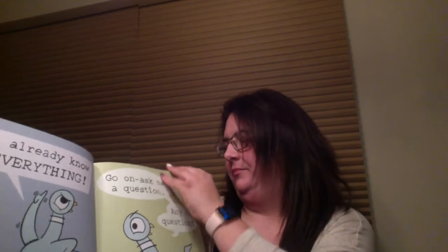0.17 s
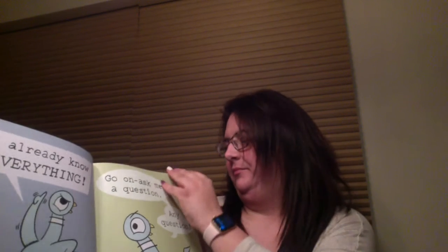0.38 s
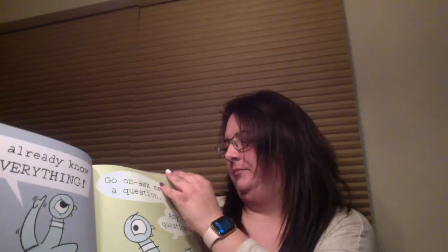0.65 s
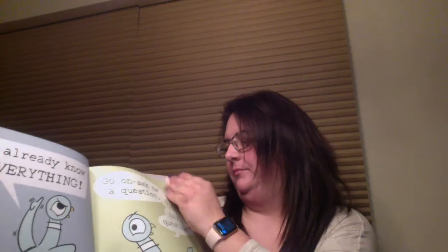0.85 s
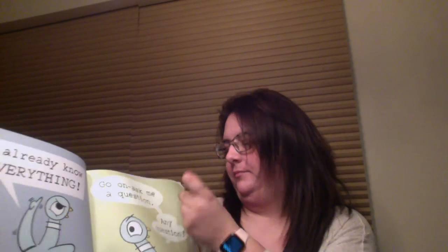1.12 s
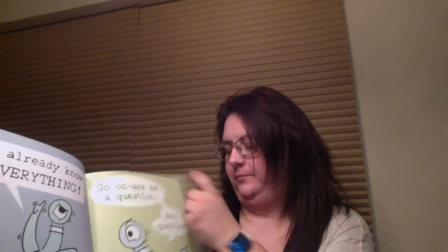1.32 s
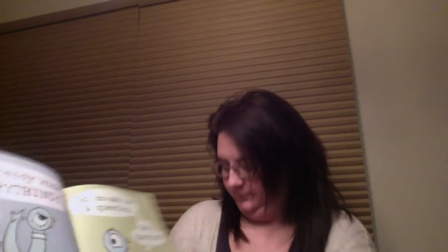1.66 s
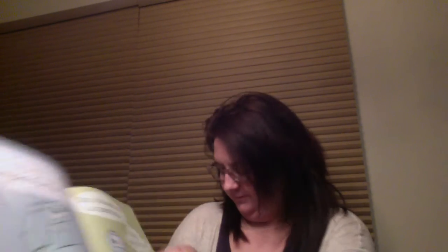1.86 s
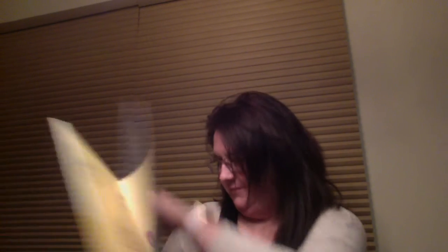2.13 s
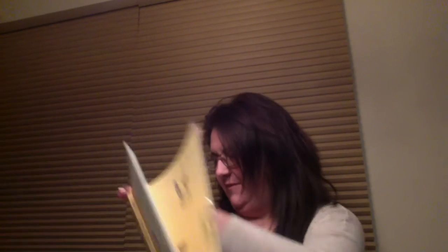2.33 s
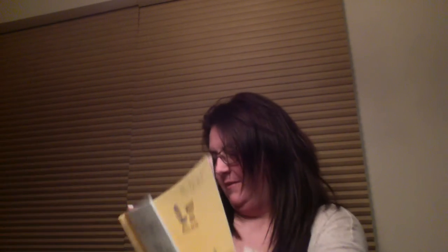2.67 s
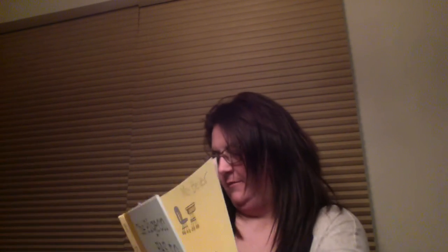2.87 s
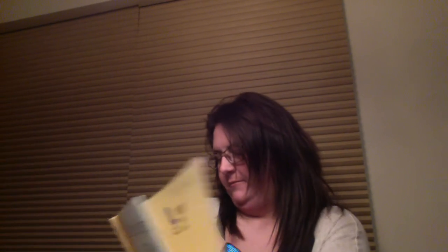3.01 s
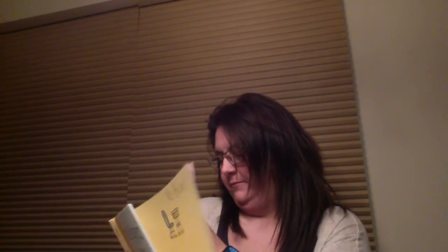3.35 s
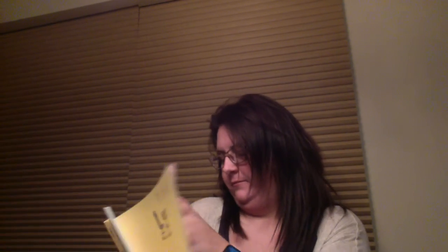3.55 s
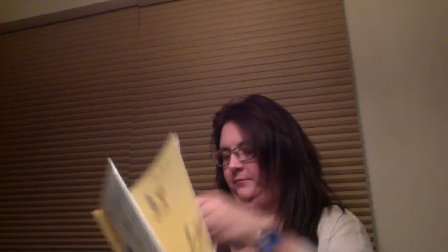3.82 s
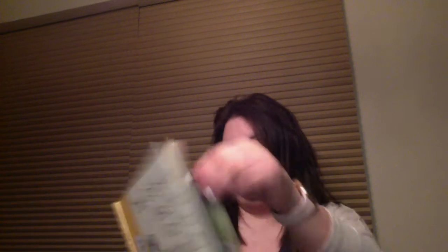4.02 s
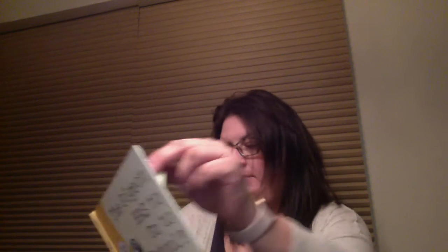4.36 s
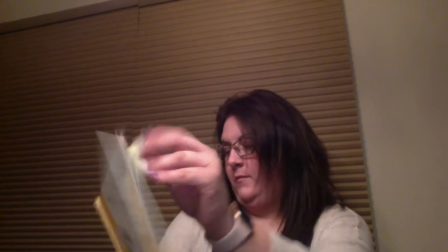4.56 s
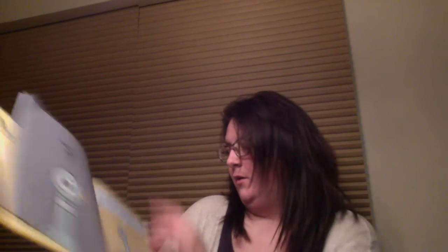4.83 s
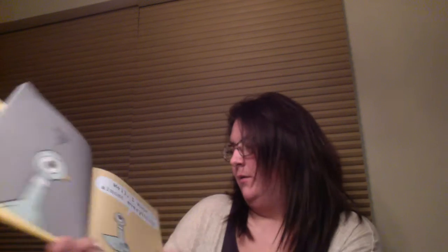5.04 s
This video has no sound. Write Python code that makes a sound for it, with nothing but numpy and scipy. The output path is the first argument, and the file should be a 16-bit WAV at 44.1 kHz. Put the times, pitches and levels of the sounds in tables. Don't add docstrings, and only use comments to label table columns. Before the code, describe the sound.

A low, soft fan hum and room tone run throughout a small furnished room, heard through a thin small microphone close to a stiff-paged book. For the first 0.7 s there is only barely audible sheet dragging. At 0.8 s a page buckles with a dry pop, followed by bright finger hiss; a second, multi-part buckle comes at 1.35 s. Grainy rubbing and strokes swell around 1.6 and 2.0 s. A corner flicks free at 2.4 s, small creases crackle at 2.7 s, and a page slaps sharply at 3.0 s. Sheets buckle at 3.4 s, rubbing rises from 3.65 s, a flat slap lands at 3.82 s and the hardest snap hits at 3.9 s, with a brief room tail. Crisp flicks flutter at 4.15-4.26 s, lighter ones at 4.6 and 4.73 s, then near quiet, with a tiny last buckle at 5.15 s.

```python
import sys
import numpy as np
from scipy import signal
from scipy.fft import rfft, irfft
from scipy.io import wavfile

SR = 44100
rng = np.random.default_rng(int(sys.argv[2]) if len(sys.argv) > 2 else 0)


def ratio(d):
    e = np.asarray(d, float) / 20
    return 10 ** e


def digitize_waveform(pressure):
    field = np.atleast_2d(pressure).T
    bounded = np.clip(field, -1, 1)
    quanta = np.round(bounded * 32767).astype(np.int16)
    wavfile.write(sys.argv[1], SR, quanta)


N = 228702


def rms_one(x):
    return x / np.sqrt(np.mean(x ** 2) + 1e-30)


def at_hz(points, hz):
    table_hz, value = np.transpose(points)
    return np.interp(np.log(hz + 1), np.log(table_hz), value)


def in_time(rows):
    s, value = np.transpose(rows)
    return np.interp(np.arange(N) / SR, s, value)


def coloured(x, spectrum, outside_db=-60):
    below = (spectrum[0][0] / 1.5, outside_db)
    above = (spectrum[-1][0] * 1.3, outside_db)
    hz = np.arange(len(x) // 2 + 1) * SR / len(x)
    return irfft(rfft(x) * ratio(at_hz([below, *spectrum, above], hz)), len(x))


def butter(x, order, hz, kind):
    return signal.sosfilt(signal.butter(order, hz, kind, fs=SR, output="sos"), x)


def resonance(x, hz, width_hz):
    r = np.exp(-np.pi * width_hz / SR)
    gain = (1 - r * r) / 2
    return signal.lfilter([gain, 0, -gain], [1, -2 * r * np.cos(2 * np.pi * hz / SR), r * r], x)


def drift(rate):
    r = np.exp(-2 * np.pi * rate / SR)
    wander = signal.lfilter([1], [1, -2 * r, r * r], rng.standard_normal(N + SR))
    return rms_one(wander[SR:])


def friction(per_s, spread_db, clump_db):
    sizes = ratio(spread_db * np.minimum(rng.exponential(1, N), 5)) * rng.choice([-1, 1], N)
    slips = rng.random(N) < per_s / SR
    return sizes * slips * ratio(clump_db * drift(74))


def patchy(x, edges, patchy_db, rate):
    bands = [butter(x, 2, pair, "band") for pair in zip(edges, edges[1:])]
    return [band * ratio(patchy_db * drift(rate)) * (-1) ** k for k, band in enumerate(bands)]


def gestures(rows, rest_db, rest_share_db):
    t = np.arange(N) / SR
    roundness = 0.83
    main, second = ratio(2 * rest_db), ratio(2 * (rest_db + rest_share_db))
    for s, db, rise_s, fall_s, share_db in rows:
        away = np.abs(t - s) / np.where(t < s, max(rise_s, .002), max(fall_s, .002))
        power = ratio(2 * (db - 20 * np.minimum(away, 10) ** roundness))
        main = main + power
        second = second + power * ratio(2 * share_db)
    return 10 * np.log10(main), 10 * np.log10(second / main)


# frequency in Hz, level in dB per Hz.
ROOM_TONE = [(30, -54), (62, -28), (82, -51), (100, -20), (125, -11.5), (240, -11), (300, -6), (440, -11.5),
             (900, -14.5), (2100, -18), (2700, -25), (4200, -29), (8000, -45.5), (16000, -55)]
# frequency in Hz, width in Hz, level in dB.
FAN_WHISTLES = [(288.9, 9.9, -72.5), (580, 14.7, -76.5), (1400, 14, -76), (3030, 2.2, -98),
                (10100, 27, -100)]
# time in seconds, gain in dB.
ROOM_SWELL = [(0, 1), (.8, 1), (1.3, 5), (2, 4), (2.8, 3.5), (3.6, 6), (4.3, 6.5), (4.8, 1.5), (5.19, 2.5)]


def background():
    room_noise, fan_noise = rng.standard_normal((2, N))
    tone = ratio(-61.5 - 3.0) * rms_one(coloured(room_noise, ROOM_TONE)) * ratio(2.43 * drift(10.3))
    fan = np.zeros(N)
    for hz, width_hz, db in FAN_WHISTLES:
        whistle = resonance(resonance(fan_noise, hz, width_hz), hz, width_hz)
        fan += ratio(db) * rms_one(whistle)
    return ratio(in_time(ROOM_SWELL)) * (tone + fan)


# delay in milliseconds, level in dB.
NEAR_ECHOES = [(6.5, -14), (11, -13), (18, -37), (25, -31)]
# frequency in Hz, time to fall 60 dB in seconds.
ROOM_DECAY = [(150, 0.36), (600, 0.3), (2000, 0.3), (6000, 0.29), (14000, 0.12)]


def room(x):
    size = SR // 2
    t, tail = np.arange(size) / SR, np.zeros(size)
    white = rng.standard_normal((2, size))
    edges = 90 * 2 ** np.arange(0, 7.6, .75)
    for k, (low, high) in enumerate(zip(edges, edges[1:])):
        band = butter(white[k % 2], 2, [low, high], "band")
        tail += band * ratio(-60 * t / at_hz(ROOM_DECAY, np.sqrt(low * high)))
    tail *= np.clip((t - .002) / 0.0023, 0, 1)
    tail *= ratio(-8.5) / np.sqrt(np.sum(tail ** 2))
    for ms, echo_db in NEAR_ECHOES:
        tail[round(ms * SR / 1000)] += ratio(echo_db)
    return signal.fftconvolve(x, tail)[:N]


# frequency in Hz, level in dB per Hz.
SKIN_COLOUR = [(2940, -29), (5000, -6.5), (5540, -8), (7560, -2.5), (8210, -10.5), (9370, -3),
               (11100, -6.5), (13100, -10.5), (16000, -22)]
# peak in seconds, hiss in dB, rise in seconds, fall in seconds, brightness in dB.
FINGER_STROKES = [(.925, -53, 0.038, 0.1, -6.5), (1.03, -60.5, 0.087, 0.1, 0.5),
                  (1.16, -85, .06, 0.089, 16), (2.08, -65, 0.17, 0.18, 2.5), (1.225, -58, 0.11, 0.15, -3),
                  (1.6, -69, 0.087, 0.087, -6), (1.809, -79, 0.13, 0.087, -5), (2.0, -52, 0.052, 0.19, -3),
                  (2.18, -70, 0.073, 0.13, 3), (2.59, -61, 0.044, .18, -15), (2.722, -51, 0.031, 0.045, -6),
                  (2.94, -55, 0.14, 0.072, -4), (3.27, -60, 0.034, 0.15, -6.5),
                  (3.666, -42.5, 0.037, 0.039, -11), (3.73, -49, 0.11, 0.18, 0),
                  (3.812, -40, 0.026, 0.034, 4), (4.078, -55, 0.021, 0.017, 2),
                  (4.565, -59, 0.043, 0.11, 5.5)]
# peak in seconds, hiss in dB, fall in seconds, brightness in dB.
EDGE_BRUSHES = [
    (.81, -65, .12, -8),
    (2.415, -56.5, 0.066, -8),
    (3.025, -50, 0.087, -34),
    (3.399, -54.5, 0.046, -5),
    (3.554, -57, 0.17, -2.5),
    (3.914, -45, 0.16, -2.5),
    (4.16, -51, 0.049, 5.5),
    (4.209, -64.5, 0.21, -6),
    (4.622, -46.5, 0.06, -7),
    (4.74, -83, .04, -5),
]
# peak in seconds, hiss in dB, half width in seconds.
FAINT_TOUCHES = [
    (.255, -83, 0.067),
    (0.431, -81, 0.011),
    (.575, -78, 0.049),
    (1.461, -81, 0.013),
    (1.54, -68.5, 0.029),
    (4.332, -67.5, .03),
    (4.9, -77, .02),
    (5.1, -84, 0.12),
]


def strokes():
    brushes = [(s, db, 0.019, fall_s, bright_db) for s, db, fall_s, bright_db in EDGE_BRUSHES]
    touches = [(s, db, half_s, half_s, -9.5) for s, db, half_s in FAINT_TOUCHES]
    hiss_db, bright_db = gestures(FINGER_STROKES + brushes + touches, rest_db=-93.5, rest_share_db=-3)
    skin = coloured(friction(14000, spread_db=-1.5, clump_db=0.6), SKIN_COLOUR)
    bands = patchy(skin, np.geomspace(5200, 16200, 13), patchy_db=4.5, rate=9.2)
    body = rms_one(sum(bands[:6]))
    top = ratio(-1.0 + 0.65 * bright_db) * sum(bands[10:])
    treble = rms_one(sum(bands[6:10]) + top)
    return ratio(hiss_db) * (body + ratio(bright_db) * treble)


# frequency in Hz, level in dB per Hz.
COVER_COLOUR = [(500, -1.5), (800, 9), (1500, 4), (2200, 7)]
# peak in seconds, rub in dB, rise and fall in seconds (over 20 dB), cover share in dB.
SHEET_DRAGS = [(.258, -68, 0.3, 0.086, 3.5), (.39, -70.5, 0.21, 0.14, 5.5), (.93, -59, 0.16, 0.9, 2.5),
               (1.244, -56, 0.24, 0.088, 1.5), (1.468, -69, 0.076, 0.028, 19),
               (1.604, -58, 0.068, 0.064, 2), (1.98, -60.5, 0.21, 0.32, 0.5), (2.195, -55, 0.046, .11, -1),
               (2.63, -60, 0.11, 0.13, 6), (2.73, -50.5, .04, 0.062, -7), (2.946, -60, 0.62, 0.15, 4),
               (3.05, -47, .05, 0.14, -1), (3.276, -59, 0.055, 0.099, 3), (3.566, -65.5, 0.11, 0.41, 3.5),
               (3.672, -45, 0.027, 0.055, -8.5), (3.725, -43.5, 0.083, 0.24, -9),
               (3.81, -53, 0.12, 0.094, -2)]
# peak in seconds, rub in dB, fall in seconds, cover share in dB.
SHEET_SETTLES = [
    (.81, -68, 0.24, -10),
    (1.41, -81, 0.096, 21),
    (2.43, -55, 0.058, -10),
    (3.43, -58.5, 0.083, 5.5),
    (3.861, -46.5, 0.092, 3),
    (3.945, -45, 0.26, 1),
    (4.2, -55.5, 0.24, 1),
    (4.62, -53.5, 0.093, -4),
    (4.76, -67, 0.21, 10),
]
# time in seconds, frequency in Hz.
SHEET_TAUTNESS = [(0, 2880), (.78, 2830), (.92, 3600), (1.14, 3000), (1.45, 2670), (1.89, 2650),
                  (1.97, 4040), (2.3, 3140), (2.45, 4010), (2.62, 2930), (2.72, 3570), (3.1, 3045),
                  (3.56, 2724), (3.63, 3590), (3.88, 2676), (4.0, 3250), (4.6, 3775), (5.0, 2740)]


def slides():
    settles = [(s, db, 0.063, fall_s, share_db) for s, db, fall_s, share_db in SHEET_SETTLES]
    sheet_db, cover_share_db = gestures(SHEET_DRAGS + settles, rest_db=-89.5, rest_share_db=11.5)
    cover = coloured(friction(6000, spread_db=0.0, clump_db=2.0), COVER_COLOUR)
    cover = rms_one(sum(patchy(cover, np.geomspace(420, 2500, 9), patchy_db=5.0, rate=3.3)))
    slips = friction(9000, spread_db=3.0, clump_db=1.5)
    broad = coloured(slips, [(2200, 1.0), (3500, 2.5), (5500, -2.5)])
    broad = rms_one(sum(patchy(broad, np.geomspace(1900, 6000, 9), patchy_db=0.0, rate=26.0)))
    low_noise = rms_one(butter(slips, 2, 250, "low"))
    carrier = np.sin(2 * np.pi * np.cumsum(in_time(SHEET_TAUTNESS)) / SR)
    gliding = low_noise * np.sqrt(2) * carrier
    sheet = 0.82 * broad + 0.5 * gliding
    return ratio(sheet_db) * (ratio(cover_share_db) * cover + sheet)


# start in seconds, peak in dB, centre in Hz.
EDGE_TICKS = [(0.4299, -55, 7200), (0.5664, -59, 4140), (0.7945, -28, 4030), (0.9655, -33, 7640),
              (1.348, -32, 5600), (1.3872, -80, 4000), (1.4484, -66, 8000), (2.1984, -45, 4030),
              (2.399, -25.5, 4600), (2.5237, -53, 4130), (2.9981, -16, 4060), (3.543, -39.5, 7340),
              (3.9018, -16.5, 4170), (4.0104, -31.5, 4390), (4.1488, -22, 5960), (4.153, -34, 5170),
              (4.1949, -27.5, 5300), (4.2614, -44, 4610), (4.2714, -47, 4000), (4.5184, -48.5, 9820),
              (4.6169, -25, 7050), (4.7378, -38, 4200), (1.459, -46, 9000)]


def ticks():
    out, size = np.zeros(N + SR), 256
    t = np.arange(size) / SR
    for s, peak_db, hz in EDGE_TICKS:
        jolt = rng.standard_normal(size) * np.exp(-t / 0.0029)
        tick = butter(resonance(jolt, hz, 0.51 * hz) + 0.025 * jolt, 3000 and 2, 3000, "high")
        at = round(s * SR)
        out[at:at + size] += ratio(peak_db - 3.5) * tick / np.abs(tick).max()
    return out[:N]


# frequency in Hz, level in dB per Hz.
CRACK_COLOUR = [(3500, 30), (5000, 20.5), (6300, 10.5), (8000, -7.5), (11000, -2.5), (15500, -53)]


def snaps(events, width, overtone, rise_ms):
    out, size = np.zeros(N + SR), 2048
    t = np.arange(size) / SR
    push = np.exp(-((t - .0012) / 0.00014) ** 2)
    thump = resonance(push, 250, 155) + 0.31 * resonance(push, 467, 195)
    thump = thump / np.abs(thump).max()
    for s, peak_db, hz, crack_db, thump_db, ms in events:
        jolt_noise, crack_noise = rng.standard_normal((2, size))
        length = max(ms, .3) / 1000
        jolts = jolt_noise * np.exp(-t / length * 0.73) * np.minimum(1000 * t / rise_ms, 1)
        jolts[24] += 4.0
        soft = butter(jolts, 3, [0.41 * hz, 1.75 * hz], "band")
        sheet = resonance(soft, hz, width * hz) - overtone * resonance(soft, 2.15 * hz, width * 2 * hz)
        sheet = sheet / np.abs(sheet).max()
        crack = coloured(crack_noise, CRACK_COLOUR) * np.exp(-t / length * 0.4) * np.minimum(t / 0.00032, 1)
        crack = butter(crack, 2, 3500, "high")
        crack = crack / np.abs(crack).max()
        snap = sheet + ratio(crack_db + 13.5) * crack + ratio(thump_db + 8) * thump
        at = round(s * SR) - 12
        out[at:at + size] += ratio(peak_db - 3.5) * snap
    return butter(out[:N], 4, 110, "high")


def of_kind(rows, crack_db, thump_db):
    return [(s, db, hz, crack_db, thump_db, ms) for s, db, hz, ms in rows]


# start in seconds, peak in dB, centre in Hz, length in milliseconds.
CORNER_FLICKS = [
    (2.4, -30.5, 1400, 2),
    (2.407, -38, 2010, 4.8),
    (4.148, -21.5, 720, 3),
    (4.155, -30.5, 1690, 8.1),
    (4.195, -25.5, 3330, 5.8),
    (4.2, -28, 2480, 4.4),
    (4.261, -35, 2580, 2.1),
    (4.591, -37.5, 1480, 2.6),
    (4.618, -41, 1780, 6.3),
    (4.731, -42, 2250, 4.6),
]
# start in seconds, peak in dB, centre in Hz, length in milliseconds,
# pushed air in dB.
PAGE_SLAPS = [(2.999, -10, 1510, 1.5, -26), (2.9975, -26, 373, 5, -6), (3.005, -16.5, 2380, 8.1, -15.5),
              (3.546, -41, 2330, 4.6, -6), (3.821, -19, 1470, 9.3, -35), (3.825, -16.5, 756, 2.7, -7.5),
              (3.831, -30, 816, 1.8, -5), (3.838, -22.5, 1470, 8.8, -41), (3.901, -14.5, 1280, 2.3, -5),
              (3.9015, -18, 556, 8.8, -10.5), (3.918, -18.5, 1170, 9.9, -36), (4.147, -32.5, 408, 4.6, -9)]


def flat_pages():
    slaps = [(s, db, hz, -24.5, air_db, ms) for s, db, hz, ms, air_db in PAGE_SLAPS]
    flicks = of_kind(CORNER_FLICKS, crack_db=-19.5, thump_db=-33)
    return snaps(slaps + flicks, width=0.31, overtone=0.077, rise_ms=0.28)


# start in seconds, peak in dB, sheet pitch in Hz, length in milliseconds.
CRISP_CREASES = [
    (.965, -41.5, 1600, 4.6),
    (1.458, -40.5, 1470, 1.5),
    (2.706, -37.5, 1440, 12),
    (2.728, -30, 1480, 5.1),
    (3.769, -35.5, 806, 1.4),
    (4.011, -39, 1340, 3.7),
    (4.107, -46, 1380, 1.4),
    (4.738, -34, 1960, 3.8),
    (4.876, -53, 904, 1.3),
]
# start in seconds, peak in dB, sheet pitch in Hz,
# length in milliseconds.
SHEET_BUCKLES = [(.794, -18.5, 1530, 1.3), (.7945, -29.5, 900, 3.3), (1.3445, -29.5, 1990, 2.9),
                 (1.3475, -18.5, 1846, 1.8), (1.348, -34, 3000, 0.83), (1.378, -23, 1300, 8.3),
                 (1.385, -22.5, 734, 1.67), (1.396, -26, 1070, 1.7), (1.402, -57, 1020, 3.9),
                 (1.42, -62, 810, 7.3), (1.468, -32, 790, 1.2), (1.578, -36.5, 824, 3.3),
                 (1.646, -38, 815, 2.8), (3.388, -25.5, 1800, 2.8), (3.391, -30.5, 780, 2.05),
                 (3.392, -24, 1400, 8), (3.401, -21.5, 1950, 2.7), (3.902, -6.5, 1366, 2.05),
                 (4.164, -26.5, 1210, 9.2), (4.158, -31, 560, 10.4), (4.176, -34.5, 960, 6.5),
                 (4.592, -27, 870, 6.8), (4.604, -27, 1440, 4.4), (5.147, -46, 830, 2.7),
                 (3.785, -35.5, 650, 15), (4.737, -30, 825, 5.4), (2.732, -40, 1580, 8)]


def bent_sheets():
    buckles = of_kind(SHEET_BUCKLES, crack_db=-52, thump_db=-46)
    creases = of_kind(CRISP_CREASES, crack_db=-19.5, thump_db=-23)
    return snaps(buckles + creases, width=.2, overtone=.2, rise_ms=1.2)


def scene():
    pages = bent_sheets() + flat_pages() + ticks()
    return (pages + room(pages) + slides() + strokes() + background())[None]


def top_cut(x):
    return signal.sosfilt(signal.butter(12, 16410, fs=SR, output="sos"), x)


def record(dry):
    thin = butter(dry, 2, 40, "high")
    thin = signal.sosfilt(signal.cheby2(10, 50, 16500, fs=SR, output="sos"), thin)
    return top_cut(thin)


dry = scene()
out = record(dry)
digitize_waveform(out)
```